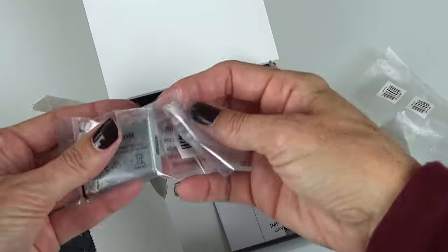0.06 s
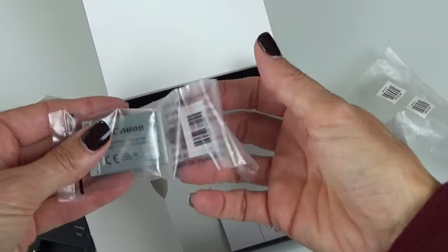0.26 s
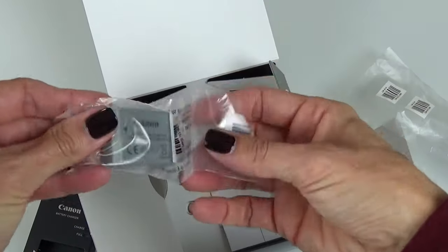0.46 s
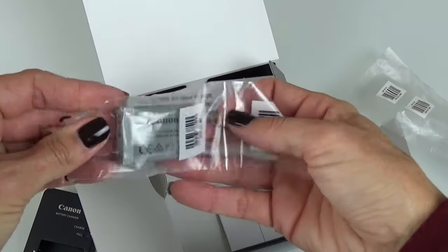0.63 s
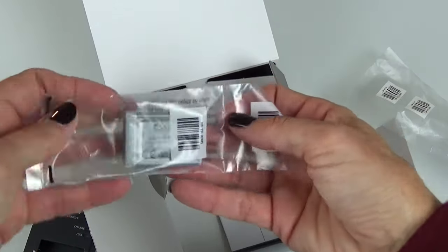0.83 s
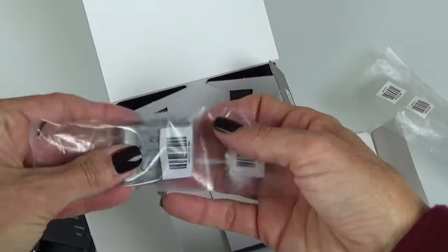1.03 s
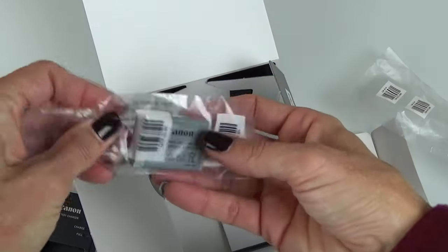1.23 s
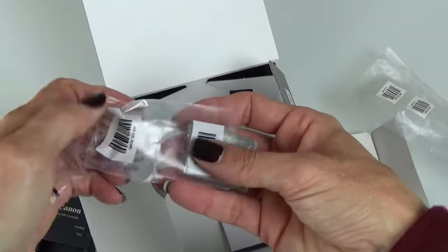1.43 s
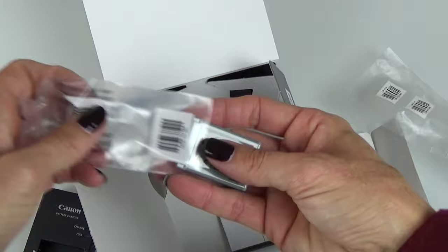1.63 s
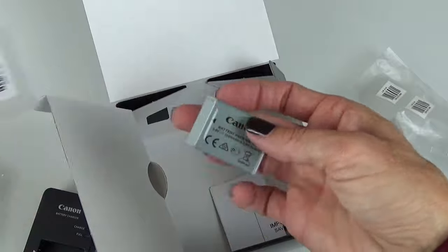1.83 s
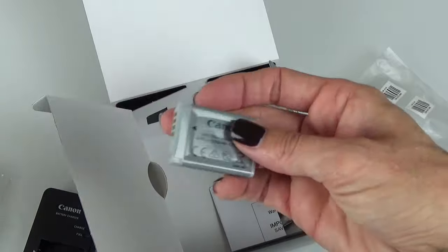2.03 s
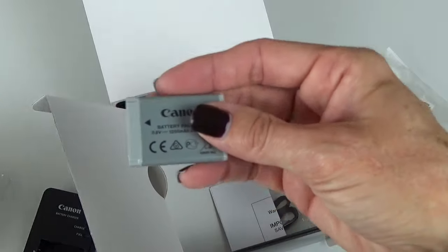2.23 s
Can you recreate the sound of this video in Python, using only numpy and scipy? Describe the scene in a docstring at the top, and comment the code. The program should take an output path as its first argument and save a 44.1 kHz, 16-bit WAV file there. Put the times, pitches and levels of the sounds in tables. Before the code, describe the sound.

Close, sharp crackling of a thin plastic bag being handled in a quiet room.

```python
"""A small room, stereo microphone close in: two hands work a small battery out of a thin plastic bag.
Creases buckle in sharp snaps, each ringing its own patch of film; tiny crackles and sliding film
fill the gaps. Now and then the bag flaps or the fingers bump the battery, and once a fingertip
rubs it. Behind the hands are short reflections and quiet room tone."""
import sys
import numpy as np
from scipy import signal
from scipy.fft import rfft, irfft, next_fast_len
from scipy.io import wavfile

SR = 44100
rng = np.random.default_rng(int(sys.argv[2]) if len(sys.argv) > 2 else 0)


def unload_audio(sound):
    """Save the sound as a 16-bit wav file, at the path given as the first command line argument."""
    columns = np.transpose(np.atleast_2d(sound))
    # keep every value between -1 and 1, then stretch to whole-number steps
    steps = np.round(np.clip(columns, -1, 1) * 32767)
    wavfile.write(sys.argv[1], SR, steps.astype(np.int16))


N = 99710
SNAP_WINDOW_S = 0.004  # snap and tone levels are energies spread over this time


def amp(db):
    """Decibels to gain."""
    return 10 ** (np.asarray(db) / 20)


def unit(x):
    """Scaled to rms 1."""
    return x / np.sqrt(np.mean(x ** 2) + 1e-20)


def along(points, hz):
    """Reads (frequency, value) points on a log frequency axis."""
    freqs, values = np.transpose(points)
    return np.interp(np.log(hz + 1), np.log(freqs + 1), values)


def curve(points):
    """Joins (time, value) points, one value per sample."""
    return np.interp(np.arange(N) / SR, *np.transpose(points))


def coloured(x, points, shape=lambda hz: 1):
    """x through a causal filter with the given spectrum, times an optional response."""
    n = x.shape[-1]
    m = 2 * next_fast_len(n)
    hz = np.fft.rfftfreq(m, 1 / SR)
    cepstrum = irfft(np.log(amp(along(points, hz))), m)
    cepstrum[1:m // 2] *= 2  # folded for minimum phase
    cepstrum[m // 2 + 1:] = 0
    return irfft(rfft(x, m) * np.exp(rfft(cepstrum)) * shape(hz), m)[..., :n]


def fade(t, t60):
    """Falls by 60 dB in t60 seconds."""
    return np.exp(-np.log(1000) * t / t60)


def add(out, start_s, sound, pan_db=0):
    """Places a sound at a time and between left and right."""
    i = max(round(start_s * SR), 0)
    part = sound[:max(N - i, 0)]
    out[:, i:i + len(part)] += amp([[pan_db / 2], [-pan_db / 2]]) * part


def sized(x, db, window_s):
    """Scaled so that its energy equals that level held over the window."""
    return amp(db) * x * np.sqrt(window_s * SR / (np.sum(x ** 2) + 1e-20))


def room_tone(mid_db=-51.5, side_db=-64):
    """The quiet, steady air of the room."""
    # spectrum of the air (frequency [Hz], level [dB])
    colour = [(25, -28), (70, -19), (130, -7), (200, -11), (320, 7.5), (450, 4), (800, 0.5), (1600, -7),
              (4000, -39), (15000, -12)]
    mid, side = unit(coloured(rng.standard_normal((2, N)), colour)) * amp([[mid_db], [side_db]])
    return np.array([mid + side, mid - side])


def reflections(x, early_db=-16.5, early_t60=0.068, tail_db=-14, side_db=-16.5):
    """Nearby surfaces answer at once, the walls linger; left and right hear nearly the same."""
    # decay of the room (frequency [Hz], t60 [s])
    decay = [(150, 0.73), (1000, 0.24), (4000, 0.26), (10000, 0.21), (16000, 0.068)]
    hz, frame_s, noise = signal.stft(rng.standard_normal((2, SR // 2)), SR, nperseg=256)
    tail = signal.istft(noise * fade(frame_s, along(decay, hz)[:, None]), SR, nperseg=256)[1]
    t = np.arange(tail.shape[1]) / SR
    tail *= 1 - np.exp(-t / 0.0031)  # builds up over about 3 ms
    early = rng.standard_normal(tail.shape) * fade(t, early_t60) * (t > 0.0015)
    response = amp(tail_db) * tail / np.linalg.norm(tail[0])
    response += amp(early_db) * early / np.linalg.norm(early[0])
    mid, side = signal.fftconvolve(x.mean(0)[None], response, axes=1)[:, :N] * amp([[0], [side_db]])
    return np.array([mid + side, mid - side])


def moving_reflections(x, positions=6):
    """The hands move, so the reflections crossfade from one position to the next."""
    place = np.linspace(0, positions - 1, N)
    return sum(reflections(x * np.sqrt(np.maximum(1 - np.abs(place - k), 0))) for k in range(positions))


def fingertip_rub(peak_s=1.906, swell_s=0.07, centre_hz=740, half_width_hz=50, db=-52):
    """Skin slides on the battery's plastic case: a faint, narrow band of noise swells and fades."""
    t, hz = np.arange(N) / SR, np.fft.rfftfreq(N, 1 / SR)
    band = irfft(rfft(rng.standard_normal(N)) / (1 + ((hz - centre_hz) / half_width_hz) ** 2), N)
    return amp(db) * unit(band) * np.exp(-((t - peak_s) / swell_s) ** 2)


def thuds(events, colour, t60, window_s):
    """Soft, dull pushes of air that die quickly."""
    out, t = np.zeros((2, N)), np.arange(SR // 8) / SR
    for start_s, db in events:
        push = coloured(rng.standard_normal(len(t)) * fade(t, t60), colour)
        add(out, start_s, sized(push, db, window_s))
    return out


def battery_bumps():
    """Fingers bump the battery: faint thuds deep in the bass."""
    # finger contacts (time [s], level [dB])
    bumps = [(.088, -60), (.488, -58), (.752, -56), (1.118, -61), (1.298, -53), (1.752, -62)]
    # spectrum of a bump (frequency [Hz], level [dB])
    colour = [(20, 0), (70, 1), (130, -3), (300, -43), (1000, -74)]
    return thuds(bumps, colour, t60=0.039, window_s=0.0044)


def bag_flaps():
    """The whole bag flaps and pushes a soft puff of air at the microphone."""
    # flaps of the bag (time [s], level [dB])
    flaps = [(.083, -36), (.179, -37), (.219, -32.5), (.455, -39.5), (.597, -38.5), (.733, -33),
             (.757, -31), (.866, -32.5), (.905, -35), (1.02, -35.5), (1.052, -34), (1.668, -28),
             (1.746, -34.5), (1.797, -35.5), (1.83, -40), (2.141, -40.5)]
    # spectrum of a flap (frequency [Hz], level [dB])
    colour = [(60, -34), (150, -12), (250, 3.5), (450, 10.5), (600, -2), (1000, 4.5), (2000, -12),
              (6000, -21)]
    return thuds(flaps, colour, t60=0.043, window_s=0.0038)


def crackle(ticks_per_s=700, spread_db=5.5, grain_db=-3, slide_db=-7):
    """Countless tiny creases tick over the hiss of sliding film."""
    # how hard the film is worked (time [s], crackle level [dB])
    effort = [(0, -28), (.11, -42), (.15, -36.5), (.25, -37), (.335, -58), (.36, -35), (.52, -34),
              (.62, -37), (.68, -36.5), (.76, -29), (.82, -37), (.88, -28.5), (.93, -26), (.96, -51),
              (1.03, -45), (1.055, -25.5), (1.09, -36), (1.17, -24.5), (1.27, -37.5), (1.33, -22.5),
              (1.38, -37), (1.43, -37), (1.447, -25.5), (1.465, -28.5), (1.485, -25), (1.56, -48),
              (1.625, -45), (1.65, -23.5), (1.72, -33.5), (1.77, -31), (1.81, -44), (1.85, -40.5),
              (1.92, -52.5), (1.96, -38.5), (2.0, -41), (2.045, -33.5), (2.1, -39), (2.15, -38),
              (2.19, -45), (2.26, -47)]
    # spectrum of the film's body (frequency [Hz], level [dB])
    body_colour = [(40, -28), (100, -53), (260, -10), (560, -10.5), (900, -6), (1600, -3), (3300, -3.5),
                   (5400, -9), (6700, -16), (12000, -27.5)]
    # spectrum of its fizz (frequency [Hz], level [dB])
    fizz_colour = [(200, -60), (2000, -33), (5500, 1.5), (6700, -6.5), (8000, 1), (10400, 3.5),
                   (12500, 3.5), (14500, -8), (16000, -2.5)]
    # brightness of the crackle (time [s], fizz over body [dB])
    brightness = [(0, -1), (.3, 6), (.55, 0), (.75, 11), (.87, -9), (.93, 15), (1.03, -2.5), (1.2, 3),
                  (1.35, 7), (1.5, -1), (1.66, 9), (1.73, 6.5), (1.84, 0), (1.91, -5.5), (2.05, 5.5),
                  (2.15, 0.5), (2.26, -2)]
    t = np.arange(SR // 100) / SR
    fires = rng.random(N) < ticks_per_s / SR
    ticks = fires * amp(spread_db * np.minimum(rng.standard_normal(N), 2))
    tick_power = signal.fftconvolve(ticks ** 2, fade(t, t60=0.008) ** 2)[:N]
    grains = unit(np.sqrt(np.abs(tick_power)))
    envelope = np.hypot(amp(grain_db) * grains, amp(slide_db))
    body = unit(coloured(rng.standard_normal(N) * envelope, body_colour))
    fizz = unit(coloured(rng.standard_normal(N) * envelope, fizz_colour))
    fizz_gain = amp(curve(brightness))
    return amp(curve(effort)) * (body + fizz_gain * fizz) / np.hypot(1, fizz_gain)


def taut_patches(cycles_to_t60=28):
    """Taut patches ring on at a clear pitch, which makes their snaps hollow or brittle."""
    # ringing patches of film (time [s], pitch [Hz], level [dB])
    tones = [(.0066, 1960, -18.5), (.0066, 2850, -20), (.0838, 2500, -22), (.118, 1245, -29),
             (.218, 1240, -27.5), (.218, 2820, -20), (.218, 4600, -25), (0.2861, 1400, -29),
             (.2859, 10700, -24.5), (.4034, 4300, -22), (.4276, 3100, -19.5), (.4551, 10300, -18),
             (.6256, 3530, -19.5), (1.5958, 13000, -20.5), (2.0114, 2370, -23), (2.0118, 3600, -24),
             (2.0123, 4800, -28), (2.114, 2250, -29.5), (2.115, 2780, -27), (2.114, 3630, -22.5),
             (2.114, 4930, -26)]
    out, t = np.zeros((2, N)), np.arange(SR // 32) / SR
    for start_s, hz, db in tones:
        swing = np.sin(2 * np.pi * hz * t) * fade(t, cycles_to_t60 / hz)
        add(out, start_s, sized(np.diff(swing), db, SNAP_WINDOW_S))  # differenced, so the tone carries no bass
    return out


def jolt(t60, flip_db=-5, shiver_db=-15, shiver_t60=0.026):
    """One crease gives way: a clean flip, a dying flutter and a faint shiver of the whole sheet."""
    t = np.arange(SR // 32) / SR
    flutter = rng.standard_normal(len(t)) * (fade(t, t60) + amp(shiver_db) * fade(t, shiver_t60))
    flip = np.arange(len(t)) == SR // 3000
    return flutter / np.linalg.norm(flutter) + amp(flip_db) * flip


def snaps(typical_t60=0.0045, pop_t60_ratio=2.26):
    """Creases buckle right at the microphone: each a ringing patch, a low pop and a bright crack."""
    # buckling creases (time [s], ring level [dB], ring pitch [Hz], pop over ring [dB],
    # crack over ring [dB], t60 [s])
    creases = [(0.0065, -17.5, 2660, -17, -6.5, 0.0038), (0.0126, -33, 2520, 0, 4.5, 0.006),
               (0.0546, -19, 3180, -13, -13, 0.0049), (0.0696, -23.5, 1620, -9, -13, 0.0073),
               (0.0836, -16.5, 2900, -7, -5.5, 0.0074), (0.0944, -16, 4900, -32, -3, 0.0026),
               (0.1086, -30, 4050, -11, 1, 0.0044), (0.1178, -21, 2100, -6, -12, 0.0049),
               (0.1592, -27, 2560, -12, -4, 0.016), (0.1718, -28.5, 3160, -6, -20, 0.0059),
               (0.1793, -27.5, 2440, -3.5, -6, 0.0063), (0.2178, -19.5, 2290, -9, -3, 0.019),
               (0.229, -22, 3440, -13, 5, 0.0023), (0.2857, -21.5, 2530, -9.5, 3, 0.0027),
               (0.297, -25.5, 2820, -18, -18, 0.0081), (0.3422, -18.5, 3400, -23, -15, 0.0042),
               (0.355, -16.5, 3130, -11, -6, 0.0027), (0.3716, -16.5, 3500, -30, -6, 0.0026),
               (0.3799, -17, 5300, -26, -7.5, 0.0031), (0.395, -18, 3940, -18, 0.5, 0.009),
               (0.4032, -23, 4290, -17, 0, 0.0062), (0.4275, -17, 3460, -25, -21, 0.0018),
               (0.4392, -25, 4440, -16, 0, 0.0058), (0.455, -23.5, 3500, -5.5, 5, 0.0025),
               (0.472, -32.5, 4320, -17, 14.5, 0.0095), (0.476, -17, 3500, -15.5, 1.5, 0.0073),
               (0.4908, -15.5, 3200, -23, -0.5, 0.0061), (0.5045, -24.5, 3720, -10, -5, 0.0038),
               (0.5276, -18.5, 3380, -27, -14, 0.0048), (0.5327, -21, 3220, -21, 6, 0.012),
               (0.5827, -29.5, 2870, -9.5, -7, 0.008), (0.5951, -22, 3620, -9.5, -4.5, 0.01),
               (0.6253, -19, 3700, -12, 0.5, 0.005), (0.6435, -24.5, 3320, -14.5, -12, 0.0061),
               (0.665, -40, 4700, -23, 22, 0.0027), (0.6797, -17, 3970, -14.5, 1.5, 0.026),
               (0.6847, -17.5, 3900, -18.5, -1, 0.0041), (0.697, -27, 4280, -26, 7.5, 0.0036),
               (0.7183, -22, 4470, -12, 0.5, 0.0053), (0.725, -26, 4920, -9, 6.5, 0.0025),
               (0.731, -18, 3540, -10.5, -1.5, 0.021), (0.7449, -22, 4490, -19, -2, 0.0022),
               (0.7524, -25.5, 4300, 1.5, 3, 0.012), (0.7567, -21.5, 3700, -8, 1, 0.0089),
               (0.7615, -17, 3600, -7, -3, 0.0039), (0.7782, -22.5, 4250, -12, -4, 0.0056),
               (0.7878, -17.5, 3840, -9.5, -2, 0.0071), (0.7924, -19.5, 4420, -27, -6, 0.0045),
               (0.8204, -23, 4070, -31, 5.5, 0.0025), (0.861, -21.5, 3770, -20, 2, 0.0036),
               (0.8652, -17.5, 3900, -13, 1, 0.0062), (0.876, -20.5, 3080, 0.5, 0, 0.0059),
               (0.8911, -19.5, 4300, -32, 6, 0.034), (0.9035, -19.5, 4330, -7.5, -9, 0.0077),
               (0.9707, -32.5, 1950, 3.5, -17, 0.0088), (1.0202, -35.5, 2120, 0.5, -13, 0.0041),
               (1.053, -24.5, 3300, -19, 0, 0.01), (1.0595, -19.5, 3450, -20, -3.5, 0.0043),
               (1.065, -19.5, 3400, -9, -16, 0.015), (1.0997, -15, 4870, -28, -4, 0.0032),
               (1.1231, -19.5, 4250, -17, 3.5, 0.0014), (1.1353, -28, 3360, -26, -7, 0.0084),
               (1.1426, -19.5, 3960, -29, -7, 0.0013), (1.1518, -20.5, 3810, -14, 0, 0.0073),
               (1.1708, -27, 4650, -23, 6.5, 0.011), (1.1743, -19.5, 4400, -16, 5, 0.0087),
               (1.1939, -17, 3970, -12.5, -6.5, 0.0067), (1.223, -30, 4450, -29, 14, 0.0028),
               (1.2268, -24.5, 4180, -10.5, 4, 0.0035), (1.2414, -24.5, 2640, -18, -3, 0.0022),
               (1.2539, -23, 3900, -3, 6.5, 0.0035), (1.2849, -27, 4940, -21, 5, 0.002),
               (1.3031, -17, 4040, -8, -1, 0.0041), (1.3139, -21, 3300, 1.5, -2, 0.0043),
               (1.3204, -23, 3530, -13, -1, 0.0064), (1.3254, -22, 4370, -20, -1, 0.005),
               (1.331, -19.5, 3300, -26, -3, 0.0064), (1.3439, -17.5, 5500, -13, -3, 0.0092),
               (1.3522, -17.5, 2120, -7.5, -12, 0.0031), (1.358, -19, 3020, -12.5, -2, 0.0047),
               (1.3696, -21.5, 2790, -29, -10, 0.0035), (1.3874, -28, 2250, -9, 2, 0.0063),
               (1.3923, -16.5, 3340, -14, -2, 0.0052), (1.404, -15, 4500, -31, -13, 0.014),
               (1.4091, -32.5, 3060, -18, 11, 0.0027), (1.4184, -30.5, 4280, -22, 10, 0.0015),
               (1.4413, -23, 3430, -9, -16, 0.0086), (1.4581, -17, 4090, -23, -2, 0.0049),
               (1.47, -19, 2760, -19, -1, 0.0064), (1.493, -19, 3300, -14, -1.5, 0.0037),
               (1.589, -24, 2270, -8.5, -21, 0.004), (1.5964, -28.5, 4800, -12, 5.5, 0.0014),
               (1.6017, -26.5, 2180, -3, -11, 0.0054), (1.6331, -21.5, 2660, -7, -15, 0.0029),
               (1.6416, -18.5, 3080, -6.5, -2.5, 0.0045), (1.654, -20, 2870, 0, -10, 0.019),
               (1.6616, -20.5, 2970, -3.5, -5, 0.0077), (1.6683, -27, 4080, -8, -13, 0.0072),
               (1.7055, -17, 3300, -14.5, -5, 0.0061), (1.7493, -27.5, 3540, -4.5, 1, 0.0037),
               (1.7656, -21, 3100, -11, 2, 0.0082), (1.853, -38.5, 4200, -12, -2, 0.004),
               (1.8836, -27.5, 2700, -4.5, -12, 0.011), (2.0116, -22.5, 3100, -12, -11, 0.0022),
               (2.0395, -24.5, 2730, -16, -5, 0.0073), (2.0489, -30, 4220, -16, 9.5, 0.0087),
               (2.0646, -26.5, 3030, -25, -4, 0.0074), (2.0836, -30.5, 3230, -13, -12, 0.0065),
               (2.114, -29, 5400, 0.5, -10, 0.008), (2.1442, -24, 3000, -24, -24, 0.0041),
               (2.1558, -32, 4370, -15, 4.5, 0.01), (2.2017, -31, 3730, -12, -2, 0.0048),
               (2.2188, -32, 3800, -3.5, -7, 0.0092)]
    # spectrum that drives the ring (frequency [Hz], level [dB])
    ring_colour = [(100, -26), (500, -21.5), (1300, -6.5), (2000, 1.5), (4000, 0), (5600, -0.5),
                   (6700, -6.5), (10000, -1), (16000, -32)]
    # spectrum of the pop (frequency [Hz], level [dB])
    pop_colour = [(40, -58), (120, -31), (250, -23.5), (550, -16), (800, -1.5), (1200, 2.5), (1700, 0),
                  (3000, -9.5), (8000, -53.5)]
    # spectrum of the crack (frequency [Hz], level [dB])
    crack_colour = [(300, -56), (3000, -32), (5500, -6), (6700, -14), (7800, -3), (10400, 2), (12000, -1),
                    (14000, -9.5), (16000, -13.5)]
    out = np.zeros((2, N))
    for start_s, db, hz, pop_db, crack_db, t60 in creases:
        width_hz = 0.5 * hz * (typical_t60 / t60) ** 0.16  # longer snaps ring with a purer pitch
        resonance = lambda f: 1j * f * width_hz / (hz * hz - f * f + 1j * f * width_hz)
        ring = sized(coloured(jolt(t60), ring_colour, resonance), db, SNAP_WINDOW_S)
        pop = sized(coloured(jolt(pop_t60_ratio * t60), pop_colour), db + pop_db, SNAP_WINDOW_S)
        crack = sized(coloured(jolt(t60), crack_colour), db + crack_db, SNAP_WINDOW_S)
        add(out, start_s, ring + pop + crack, pan_db=rng.standard_normal())
    return out


def scene():
    """The bag up close, the room behind it; the two microphone ports hear the film slightly unalike."""
    # where the bag is held (time [s], left over right [dB])
    position = [(0, 1), (1.85, 0.2), (2.01, 3.5)]
    # stereo width between the ports (frequency [Hz], side gain [dB])
    width = [(60, -5), (250, -26), (3000, -31), (5000, -21), (6600, -12), (8000, -16.5), (11500, -29),
             (15000, -32)]
    bag = snaps() + taut_patches() + crackle() + fingertip_rub() + bag_flaps() + battery_bumps()
    side = coloured(snaps().mean(0) + amp(-5) * crackle(), width)  # the crackle enters the side 5 dB weaker than the snaps
    bag_in_room = bag + np.array([side, -side]) + moving_reflections(bag)
    pan_db = curve(position)
    return bag_in_room * amp([pan_db / 2, -pan_db / 2]) + room_tone()


def record(dry, top_hz=15950):
    """The recorder clips the very highest peaks and keeps nothing above its band limit."""
    m = next_fast_len(N + SR // 2)
    passband = np.fft.rfftfreq(m, 1 / SR) < top_hz
    return irfft(rfft(np.clip(dry, -1, 1), m) * passband, m)[:, :N]


dry = scene()
out = record(dry)
unload_audio(out)
```